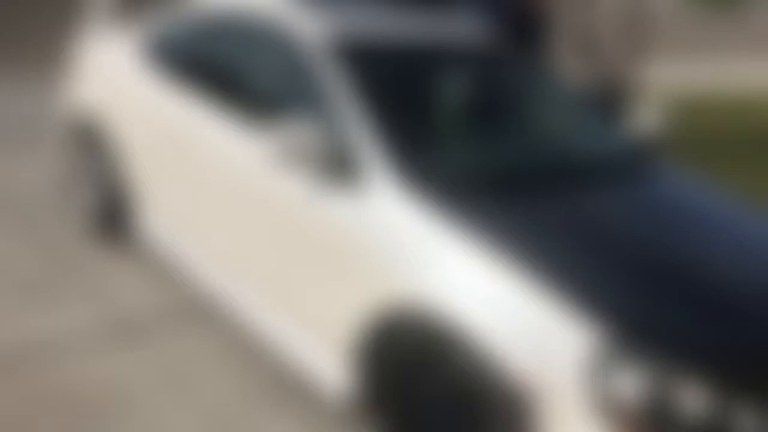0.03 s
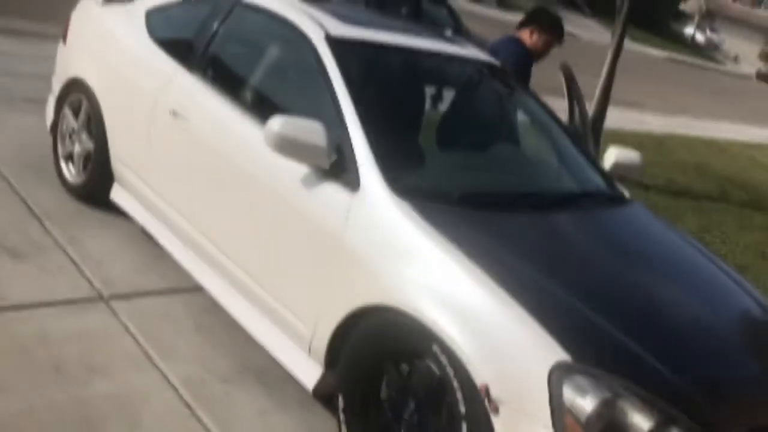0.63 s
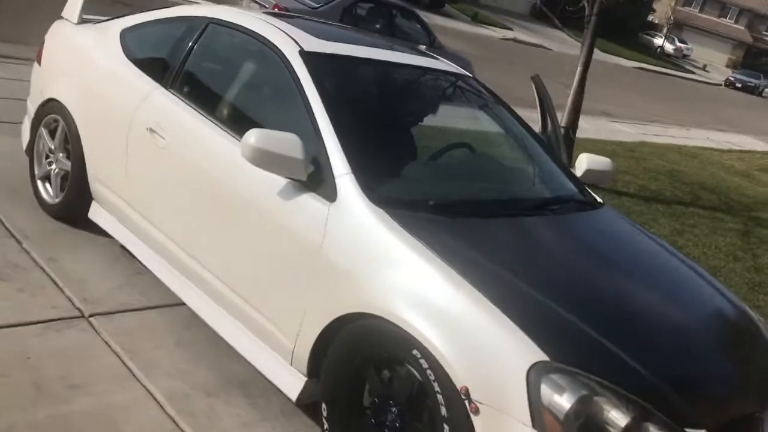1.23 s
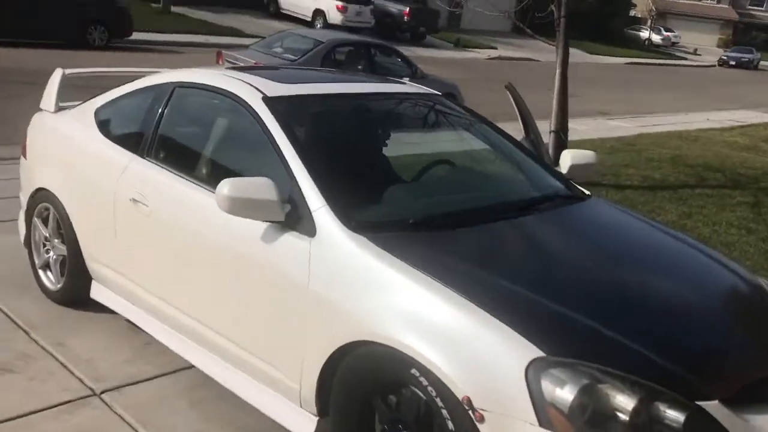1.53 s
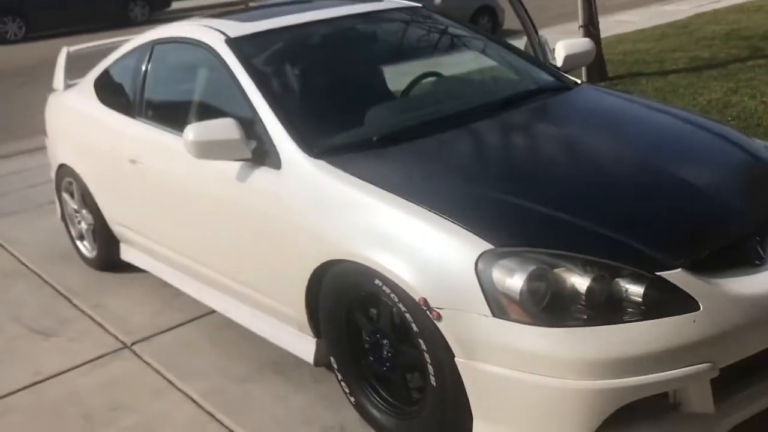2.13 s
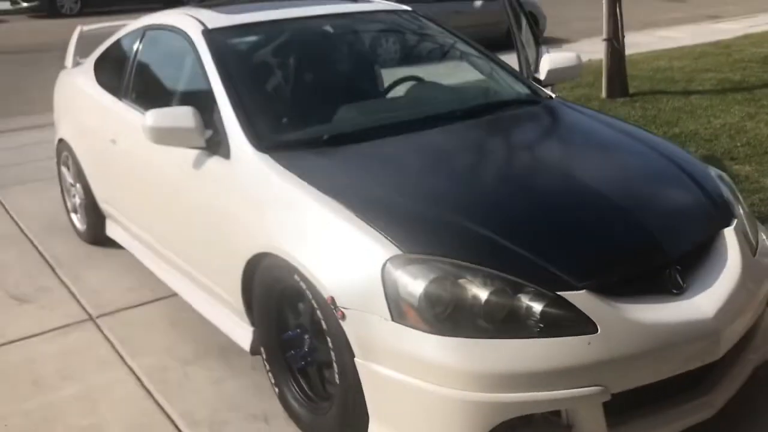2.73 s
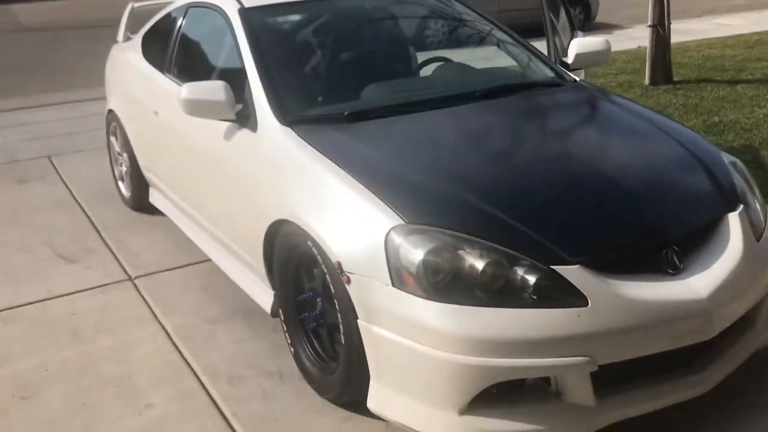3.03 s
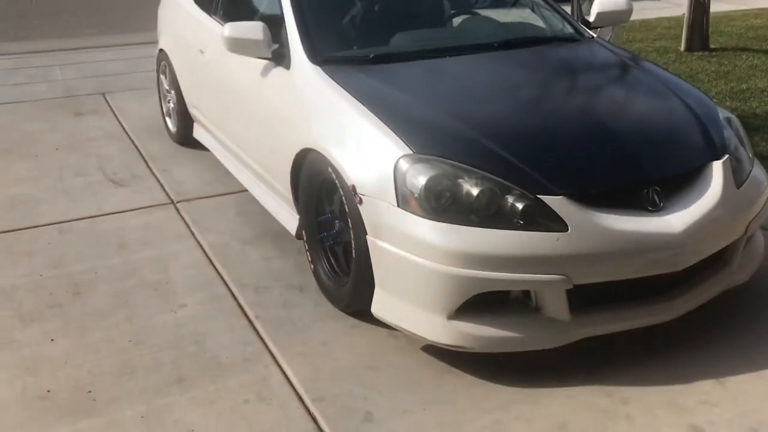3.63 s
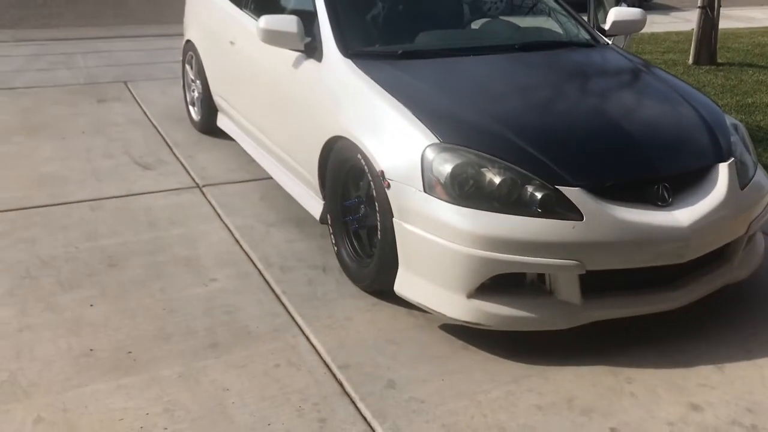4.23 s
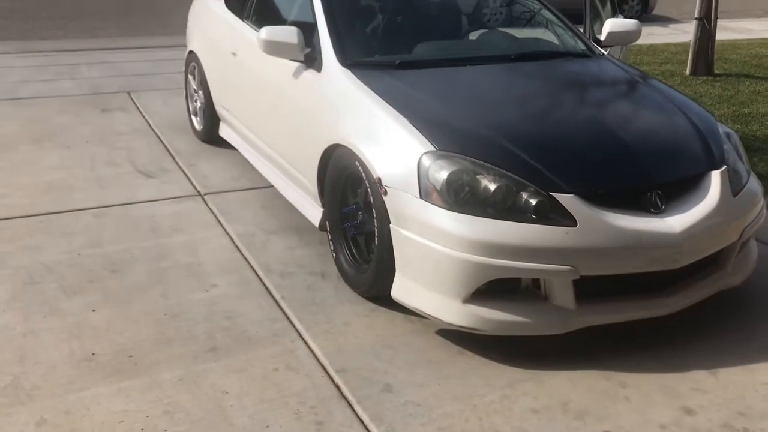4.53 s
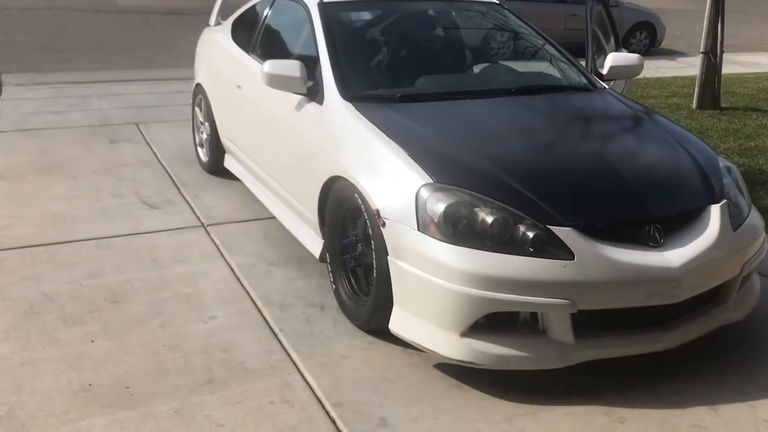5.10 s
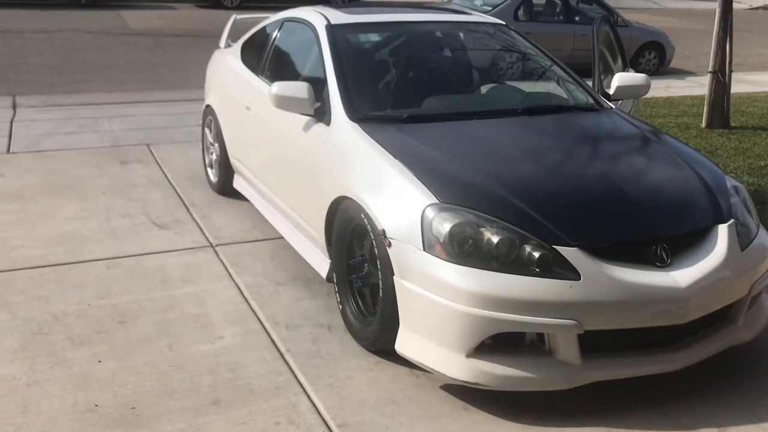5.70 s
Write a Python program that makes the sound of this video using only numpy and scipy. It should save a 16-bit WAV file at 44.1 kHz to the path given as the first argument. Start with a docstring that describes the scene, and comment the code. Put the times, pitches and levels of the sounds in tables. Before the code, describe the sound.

Birds chirp, a car door thuds and shoes scuff, then a starter cranks the engine with a pulsing metallic grind.

```python
"""Cold car cranking on a driveway

Small birds chirp over far traffic. The door thuds shut, the fuel pump hums, shoes scuff on concrete.
Then the starter gear crashes in and cranks the four-cylinder engine: its teeth groan and whine under
each compression stroke, rattle loose after it, and every cylinder puffs into the booming exhaust."""
import sys
import numpy as np
from scipy import signal
from scipy.fft import rfft, irfft, next_fast_len
from scipy.io import wavfile
from scipy.ndimage import map_coordinates

SR = 44100
rng = np.random.default_rng(int(sys.argv[2]) if len(sys.argv) > 2 else 0)


def dump_mix(stems):
    """Bounce the given channels to the path in sys.argv[1] as a 16-bit WAV at rate SR."""
    frames = np.atleast_2d(stems).T  # one column per channel
    limited = np.clip(frames, -1, 1)  # hard clip at full scale
    pcm = np.round(limited * 32767).astype(np.int16)
    wavfile.write(sys.argv[1], SR, pcm)


N = 258426
TIME = np.arange(N) / SR
ENGAGE_S = 4.03   # the pinion meets the flywheel

# bands of gear noise, groan to sizzle:
# (low edge [Hz], high edge [Hz], running [dB], crash [dB], under load [dB], overrunning [dB])
GEAR_BANDS = [(427, 2400, -38.3, -27, -30.5, -36), (2526, 3480, -39.5, -31, -30, -32),
              (3580, 6620, -37, -31, -32.5, -29), (6740, 15200, -44.5, -33.5, -34, -35)]
# compression strokes: (time of the puff [s], load on the starter [dB], overrun rattle after it [dB])
COMPRESSIONS = [(4.294, -3, -19.5), (4.433, 0, -6.5), (4.571, 0, -6.5), (4.697, -1, -2), (4.828, 0, -2.5),
                (4.957, 0, 1), (5.087, -0.5, -0.5), (5.216, 0, 0.5), (5.335, 0, -1), (5.456, 0, 0),
                (5.582, -1, -1), (5.71, -0.5, 2.5), (5.836, -0.5, 0)]


def from_db(db):
    """Decibels to gain."""
    return 10 ** (np.asarray(db) / 20)


def unit_rms(x):
    """Scale to an rms of 1."""
    return x / np.sqrt(np.mean(x ** 2) + 1e-20)


def automation(rows):
    """Turn (time, values...) breakpoints into one curve per value column."""
    times, *columns = np.transpose(rows)
    return [np.interp(TIME, times, column) for column in columns]


def filtered(x, gain_at):
    """Weight a sound by a gain that depends on frequency."""
    size = next_fast_len(N)
    hz = np.maximum(np.fft.rfftfreq(size, 1 / SR), 1)
    return irfft(rfft(x, size) * gain_at(hz), size)[:N]


def coloured(x, spectrum):
    """EQ through (frequency [Hz], gain [dB]) points, rolling off below the first."""
    points, db = np.transpose(spectrum)

    def gain_at(hz):
        return from_db(np.interp(np.log(hz), np.log(points), db)) * np.minimum(hz / points[0], 1) ** 2
    return filtered(x, gain_at)


def noise(spectrum):
    """Coloured noise, rms 1."""
    return unit_rms(coloured(rng.standard_normal(N), spectrum))


def drift(rate_hz):
    """Smooth random modulation, rms 1."""
    return unit_rms(filtered(rng.standard_normal(N), lambda hz: 1 / (1 + (hz / rate_hz) ** 2)))


def swell(centre, length):
    """A flat-topped envelope of height 1."""
    return np.exp(-np.minimum((2 * (TIME - centre) / length) ** 4, 20))


def clicks(rows, spread_db=0):
    """One impulse for each (time [s], level [dB]) row."""
    times, db = np.transpose(rows)
    heights = from_db(db + spread_db * rng.standard_normal(len(times)))
    return np.bincount((times * SR).astype(int), heights, N)[:N]


def ring(x, hz, t60):
    """One mode: a unit click sets off a decaying sine of height 1."""
    r, w = from_db(-60 / (t60 * SR)), 2 * np.pi * hz / SR
    return signal.lfilter([0, np.sin(w)], [1, -2 * r * np.cos(w), r * r], x + 1e-18)


def resonance(x, hz, width):
    """Resonant band-pass with a peak gain of 1."""
    r, w = np.exp(-np.pi * width / SR), 2 * np.pi * hz / SR
    return signal.lfilter(np.array([1, 0, -1]) * (1 - r * r) / 2, [1, -2 * r * np.cos(w), r * r], x)


def low_pass(x, hz):
    """Dull the top end."""
    return signal.sosfilt(signal.butter(2, hz, fs=SR, output="sos"), x)


def scatter(x, t60):
    """Dense reflections that die away, keeping the power."""
    tail = rng.standard_normal(SR // 2) * from_db(-60 * TIME[:SR // 2] / t60)
    return signal.fftconvolve(x, tail / np.linalg.norm(tail))[:N]


def street(hiss_db=-72):
    """Low rumble and tyre noise from far roads, over a faint hiss."""
    # colours of the three beds: (frequency [Hz], relative density [dB])
    rumble_eq = [(12, -48), (20, -24), (45, -4.5), (65, -0.5), (119, -5), (145, -11), (184, -6), (206, -15),
                 (348, -16.5), (400, -24.5), (520, -36), (880, -120)]
    tyre_eq = [(150, 3), (330, 1), (500, 8), (1100, 7.5), (1700, -3.5), (3500, -7.5), (6000, -17),
               (10000, -29)]
    hiss_eq = [(2000, 8.5), (6000, 8), (10500, -1.5), (12000, 8.5), (14000, 6.5), (16000, -14)]
    # tyre noise, swelling as one car goes by: (time [s], level [dB])
    pass_by = [(0, -63), (1.5, -61.5), (1.8, -56), (2.2, -56.5), (2.4, -63), (3.0, -65), (4.0, -61)]
    tyre_db, = automation(pass_by)
    rumble_db = -49.5 + 2.5 * np.exp(-((TIME - 1.2) / 0.55) ** 2)   # one slow swell
    rumble = from_db(rumble_db) * noise(rumble_eq)
    return rumble + from_db(tyre_db) * noise(tyre_eq) + from_db(hiss_db) * noise(hiss_eq)


def bird_notes(gap_s=0.039, note_s=0.058):
    """The notes of one bird's calls, another's falling twitters and a faint far whistle."""
    # a tall arch and a low one: (delay [s], length [s], start [Hz], top [Hz], end [Hz], offset [dB])
    call = [(0, 0.07, 3800, 5650, 3650, -0.5), (0.11, 0.0443, 3664, 4200, 3680, -4.5)]
    # the first bird's cues: (time [s], level [dB])
    call_cues = [(1.093, -52), (2.03, -68.5), (2.331, -43.5), (3.546, -48)]
    # the second bird's cues: (time [s], level [dB], notes [count])
    twitters = [(1.618, -53, 4), (2.768, -70, 1), (3.2, -50.5, 2)]
    # one almost level note: (time [s], length [s], start [Hz], top [Hz], end [Hz], level [dB])
    far_whistle = (2.878, 0.2, 2080, 2090, 2055, -71)
    notes = [(s + delay, *shape, db + offset) for s, db in call_cues for delay, *shape, offset in call]
    for s, db, count in twitters:
        for k in range(round(count)):
            top_hz = 5620 * 0.83 ** k   # each arch lower than the last
            end_hz = max(0.73 * top_hz, 2710)
            notes.append((s + k * gap_s, note_s, end_hz, top_hz, end_hz, db))
    return notes + [far_whistle]


def birds(rise_share=0.36, waver=0.014, rough_db=3.5, yard_db=-8):
    """Thin whistles that flick up and fall back, with a diffuse tail from trees and houses."""
    song, wobble = np.zeros(N), 1 + waver * drift(250)
    knees = [0, rise_share / 3, rise_share, (1 + rise_share) / 2, 1]
    for s, length, start_hz, top_hz, end_hz, db in bird_notes():
        span = slice(int(s * SR), int((s + length) * SR))
        progress = np.linspace(0, 1, len(song[span]))
        shoulder_hz = end_hz + 0.24 * (top_hz - end_hz)
        pitch = np.interp(progress, knees, [start_hz, start_hz, top_hz, shoulder_hz, end_hz])
        envelope = from_db(db) * np.abs(np.sin(np.pi * progress)) ** 0.92
        song[span] += envelope * np.sin(2 * np.pi * np.cumsum(pitch * wobble[span]) / SR)
    song *= from_db(rough_db * drift(150))
    return song + from_db(yard_db) * scatter(song, t60=0.46)


def shoes(step_decay_s=0.0192, grain_db=1.6, rasp_db=-9, overtone_db=3):
    """Soles step and drag on concrete with a hollow, squeaky rasp while sand crackles under them."""
    # one long drag: (time [s], sole [dB], grit [dB])
    drag = [(3.19, -85, -86), (3.225, -55, -55), (3.388, -47, -47.5), (3.41, -44.5, -41.5),
            (3.455, -44, -40.3), (3.53, -49.5, -49), (3.67, -72, -60), (3.76, -70, -62), (3.88, -85.5, -70)]
    # footsteps and short scuffs: (time [s], rise [s], sole [dB], grit [dB])
    steps = [(0.244, 0.01, -55, -80), (0.761, 0.031, -71, -56.5), (0.99, 0.006, -69, -59.5),
             (1.214, 0.01, -50.5, -54.5), (2.67, 0.02, -58, -64.5), (3.074, 0.005, -49, -68),
             (3.134, 0.033, -43.5, -61), (3.571, 0.015, -45, -61.5), (3.624, 0.005, -45, -70.5),
             (3.695, 0.0033, -48, -53), (3.886, 0.0053, -45.5, -55.5)]
    # hollow of a firmly pressed sole: (frequency [Hz], width [Hz], relative level [dB])
    sole_modes = [(930, 48, 10), (1427, 25, 7), (1720, 59, -5), (2440, 32, 5), (2850, 43, 11),
                  (3305, 27, 4), (3640, 48, -3), (4000, 48, 1.5)]
    # colour of the sand: (frequency [Hz], relative density [dB])
    grit_eq = [(700, -37), (1700, -2), (2350, 3.5), (2650, 2.5), (2980, 5.5), (3400, 4.5), (4000, 5.5),
               (5000, -1.5), (6800, -3), (8500, -4), (11000, -8.5), (16000, -19)]
    sole_power, grit_power = from_db(automation(drag)) ** 2
    for s, rise, sole_db, grit_db in steps:
        falloff = np.where(TIME < s, 2 * ((TIME - s) / rise) ** 2, (TIME - s) / step_decay_s)
        step = np.exp(-np.minimum(falloff, 20))
        sole_power += step * from_db(sole_db) ** 2
        grit_power += step * from_db(grit_db) ** 2
    friction = rng.standard_normal(N)
    lowest, *upper = [from_db(db) * resonance(friction, hz, width) for hz, width, db in sole_modes]
    # the tone rises as the sole is pressed harder, then holds
    pitch_ratio = np.interp(10 * np.log10(grit_power), [-58, -53], [0.84, 1])
    hollow, overtones = [map_coordinates(unit_rms(x), [np.cumsum(pitch_ratio)], order=2, mode="wrap")
                         for x in (lowest, sum(upper))]
    pressure = np.sqrt(grit_power / grit_power.max())   # only a hard drag brings out the overtones
    squeak = 0.41 * hollow + from_db(overtone_db) * pressure * overtones
    rasp = from_db(rasp_db) * noise([(250, -10.5), (850, -6), (1700, -8), (6000, -34)])
    crackle = noise(grit_eq) * from_db(grain_db * drift(200))
    return np.sqrt(sole_power) * (squeak + rasp) + np.sqrt(grit_power) * crackle


def fuel_pump(hz=179.4, on_s=2.21, rise_s=0.48, primed_s=2.94, settle_s=0.35, prime_db=-54.5, run_db=-62):
    """A small electric motor hums in the tank, easing off once the line is primed."""
    priming = np.exp(-np.maximum(TIME - primed_s, 0) / settle_s)
    level = from_db(run_db + (prime_db - run_db) * priming)
    fade_in = np.clip((TIME - on_s) / rise_s, 0, 1)
    cycles = np.cumsum(hz * (1 + 0.01075 * drift(9.9))) / SR
    return fade_in * level * np.sqrt(2) * np.sin(2 * np.pi * cycles)


def body_thuds(trim_gain_db=33):
    """Soft blows set the door and body panels ringing; seals and trim shake briefly."""
    # the driver gets in, the door shuts, the starter kicks: (time [s], strength [dB])
    blows = [(0.866, -47), (1.192, -38.5), (1.219, -51), (1.565, -37), (1.585, -33.5), (1.63, -37),
             (4.07, -40), (4.095, -41)]
    # panel modes: (frequency [Hz], gain [dB], t60 [s])
    panel_modes = [(72, -3, 0.56), (125.8, 0, 0.2), (170.5, 0, 0.21), (226.8, 0.5, 0.2), (298, -10, 0.22),
                   (347, -9, 0.19), (507, -19, 0.21), (656, -15, 0.2)]
    panels = sum((-1) ** k * from_db(db) * ring(clicks(blows, spread_db=0.5), hz, t60)
                 for k, (hz, db, t60) in enumerate(panel_modes))
    trim = low_pass(scatter(clicks(blows), t60=0.22), hz=554)
    return low_pass(panels, hz=1200) + from_db(trim_gain_db) * trim


def exhaust(puff_db=-2, rush_db=-49):
    """Every cylinder puffs into the pipe, whose low modes boom on over a steady rush of air."""
    # pipe modes: (frequency [Hz], gain [dB], t60 [s])
    pipe_modes = [(52.5, -23.5, 1.04), (65.9, -22.5, 0.2), (106.6, -60, .5), (79.9, -39, 2.2),
                  (136.7, -43, 0.64)]
    first_jolt = (4.07, -15.5)   # the pistons start to move: (time [s], strength [dB])
    puffs = clicks([first_jolt] + [(s, puff_db) for s, *_ in COMPRESSIONS])
    boom = sum((-1) ** (k + 1) * from_db(db) * ring(puffs, hz, t60)
               for k, (hz, db, t60) in enumerate(pipe_modes))
    flowing = np.clip((TIME - ENGAGE_S) / 0.012, 0, 1)
    rush = noise([(35, -27), (70, 15), (140, -4), (210, -1), (260, 5.5), (400, -1), (1500, -33)])
    return low_pass(boom, hz=1500) + from_db(rush_db) * flowing * rush


def cranking(load_share=0.41, release_s=0.025, overrun_s=0.046, spin_up_s=0.42):
    """Power envelopes of each compression's load and of the rattle as the flywheel then runs ahead."""
    load, overrun, previous = 0, 0, ENGAGE_S
    for s, load_db, overrun_db in COMPRESSIONS:
        load_s = load_share * (s - previous)
        load += from_db(load_db) ** 2 * swell(s + release_s - load_s / 2, load_s)
        sluggish = np.exp((COMPRESSIONS[0][0] - s) / spin_up_s)
        delay_s = 0.059 + 0.055 * sluggish   # the rattle comes later while the crank is still slow
        overrun += from_db(overrun_db) ** 2 * swell(s + delay_s, overrun_s)
        previous = s
    return load, overrun


def gear_band_powers(crash_hold_s=0.034, crash_decay_s=0.028):
    """Power envelope of each gear band: steady running, first crash, loaded groan and overrun rattle."""
    crash = np.exp(-np.clip((TIME - ENGAGE_S - crash_hold_s) / crash_decay_s, 0, 20))
    envelopes = np.array([np.ones(N), crash, *cranking()])
    return from_db(np.array(GEAR_BANDS)[:, 2:]) ** 2 @ envelopes


def gear_whine(free_hz=440, sag=0.27, inertia_s=0.055, run_up_s=0.2, jitter=0.02034, rough_db=2.5):
    """The loaded teeth sing, bending down in pitch as each compression slows the motor."""
    # harmonics 1 to 4 under full load: (level [dB])
    harmonics = [-44.5, -39.5, -39, -49.5]
    load = np.sqrt(cranking()[0])
    lag = np.exp(-1 / (inertia_s * SR))
    braking = signal.lfilter([1 - lag], [1, -lag], load)
    run_up = 1 - 0.32 * np.exp(-np.maximum(TIME - ENGAGE_S, 0) / run_up_s)
    teeth = np.cumsum(free_hz * run_up * (1 - sag * braking + jitter * drift(78.8))) / SR
    tone = sum(from_db(db + rough_db * drift(69)) * np.sin(2 * np.pi * k * teeth)
               for k, db in enumerate(harmonics, start=1))
    return load * np.sqrt(2) * tone


def starter(teeth_hz=404, sag=0.24, jitter=0.09, housing_db=-2.5, chug_db=-13.5, flutter_db=1.28):
    """Pinion teeth grind on the flywheel, slower under load; housing, block and engine bay ring."""
    # starter housing and flywheel modes: (frequency [Hz], width [Hz], relative level [dB])
    housing_modes = [(634, 160, -4.5), (761, 44, 1.5), (810.4, 17.5, 9.5), (901.6, 22.5, 5.5),
                     (992, 67, -1), (1090.4, 40, 6.5), (1264, 31, -0.5), (1730, 46, 3.5), (2417, 24.6, 8),
                     (2693, 33, 5.5), (2816, 28, 4), (2951, 37, 9), (3360, 59, 2), (3586, 40, -1),
                     (3942, 35, 0.5), (4250, 71, 0), (4590, 31, 0.5), (5430, 57, -0.5), (5860, 110, -4),
                     (8340, 270, -6.5)]
    # dense ring of the engine bay, hollow chug of the block: (frequency [Hz], relative density [dB])
    bay_eq = [(300, -8.5), (560, -6.5), (800, -16), (1150, -2.5), (1450, -6), (2000, -2), (3000, -3.5),
              (4300, -9.5), (5800, -8), (7200, -8), (8700, -3.5), (10300, -12.5), (15000, -7.5)]
    block_eq = [(200, -14), (300, -12), (350, 1), (440, -0.5), (490, -2), (600, -13.5), (1200, -51)]
    powers = gear_band_powers()
    groan = np.sqrt(powers[0])
    load = groan / groan.max()
    teeth = np.cumsum(teeth_hz * (1 - sag * (load - 0.5) + jitter * drift(60))) / SR
    force = from_db(np.clip(rng.standard_normal(N), -2, 2))[teeth.astype(int)]   # no two land alike
    pressure = force * np.exp(-0.97 * (teeth % 1))   # each tooth lands hard, then scrapes off
    contact, shaking = pressure * rng.standard_normal((2, N))
    housing = sum((-1) ** k * from_db(db) * resonance(shaking, hz, width)
                  for k, (hz, width, db) in enumerate(housing_modes))
    metal = unit_rms(coloured(contact, bay_eq)) + from_db(housing_db) * unit_rms(housing)
    spun_up = np.clip((TIME - ENGAGE_S) / 0.55, 0, 1)
    chug = from_db(chug_db) * unit_rms(coloured(contact, block_eq)) * groan * spun_up
    grind = np.zeros(N)
    for (low, high, *_), power in zip(GEAR_BANDS, powers):
        band = signal.sosfilt(signal.butter(7, [low, high], "band", fs=SR, output="sos"), metal)
        grind += unit_rms(band) * np.sqrt(power) * from_db(flutter_db * drift(38))
    engaged = (1 + np.tanh((TIME - ENGAGE_S) / 0.0068)) / 2
    return engaged * (chug + grind)


def scene():
    """The car, shoes, birds and street in one mono mix."""
    car = starter() + gear_whine() + exhaust() + body_thuds() + fuel_pump()
    return (car + shoes() + birds() + street())[None]


def record(dry):
    """Snap in after a moment of silence and cut the very top steeply."""
    fade_in = np.clip((TIME - 0.12) / 0.0035, 0, 1)
    return signal.sosfilt(signal.ellip(12, 0.1, 90, 15850, fs=SR, output="sos"), dry * fade_in)


dry = scene()
out = record(dry)
dump_mix(out)
```